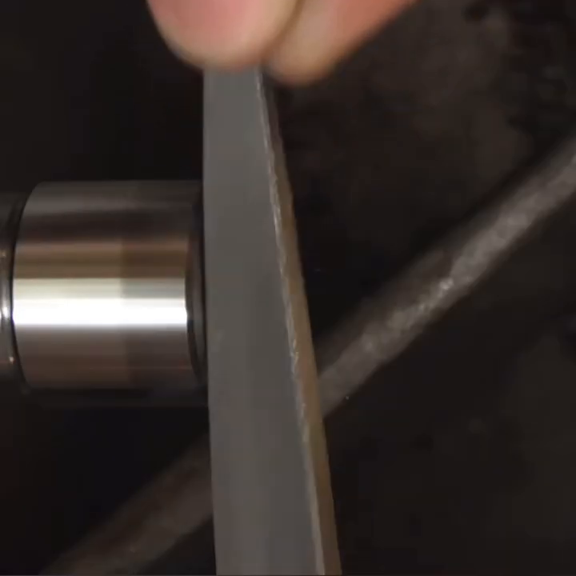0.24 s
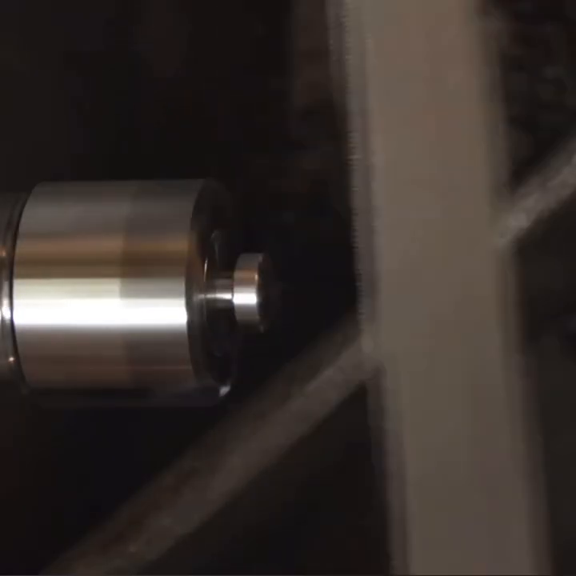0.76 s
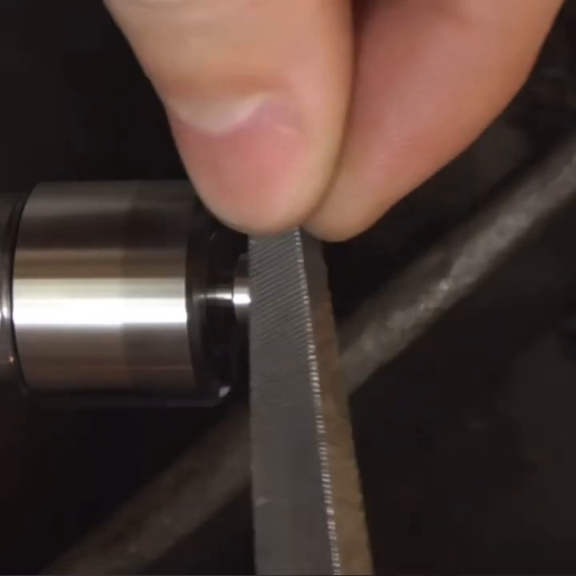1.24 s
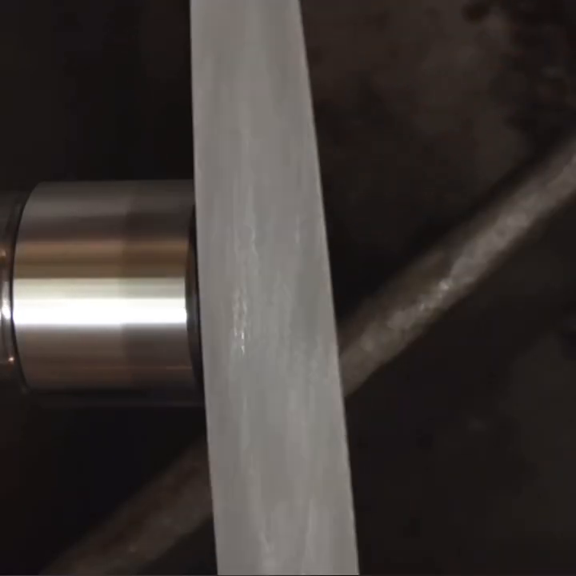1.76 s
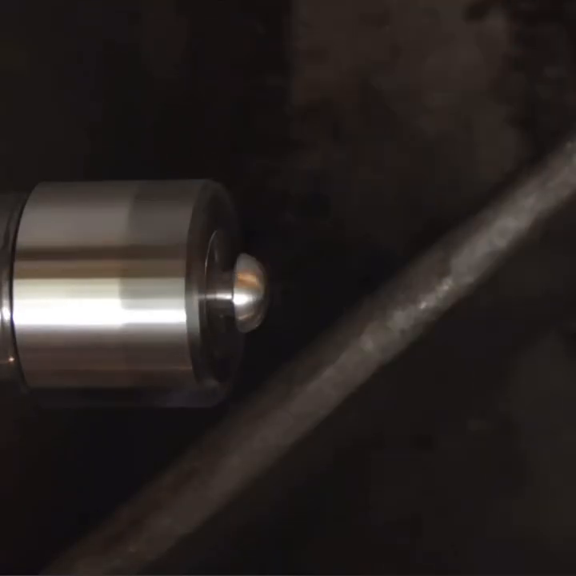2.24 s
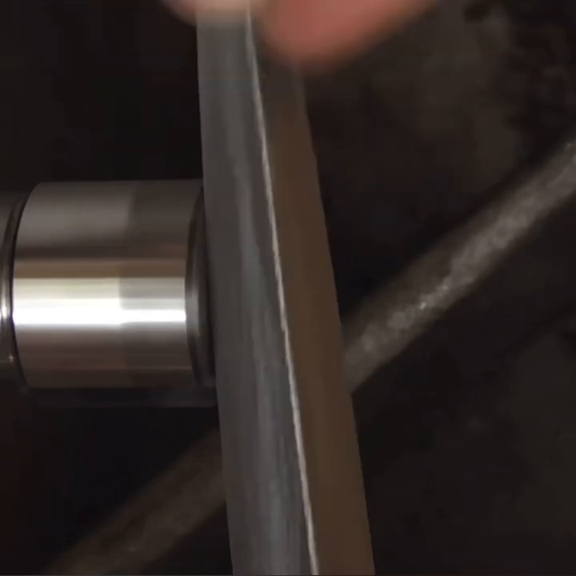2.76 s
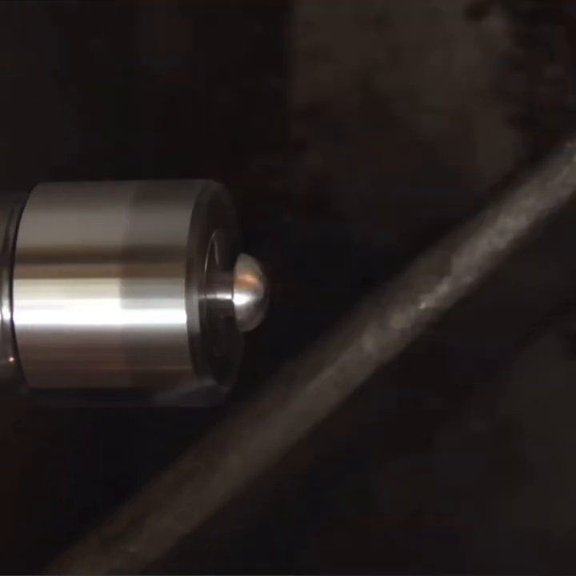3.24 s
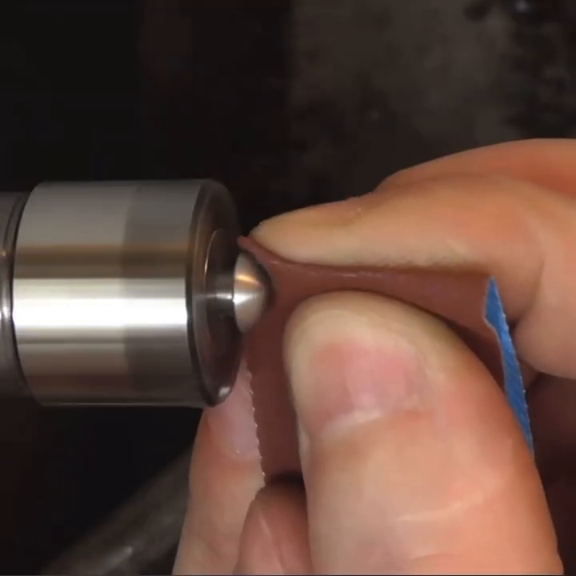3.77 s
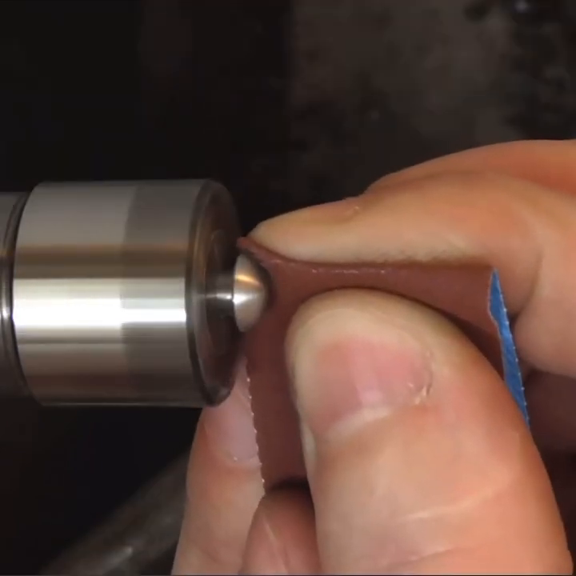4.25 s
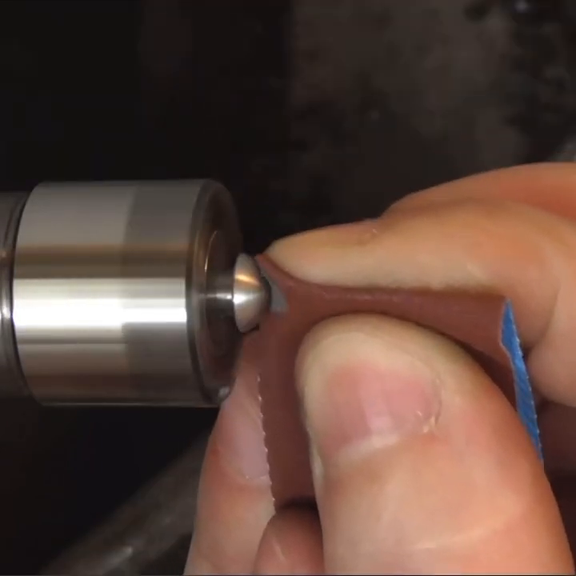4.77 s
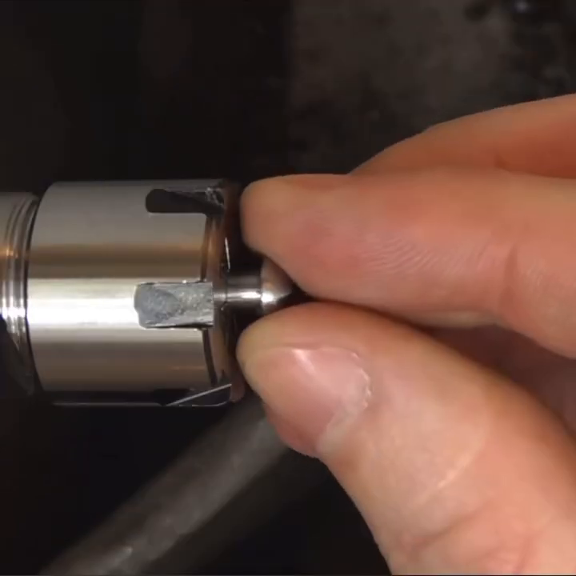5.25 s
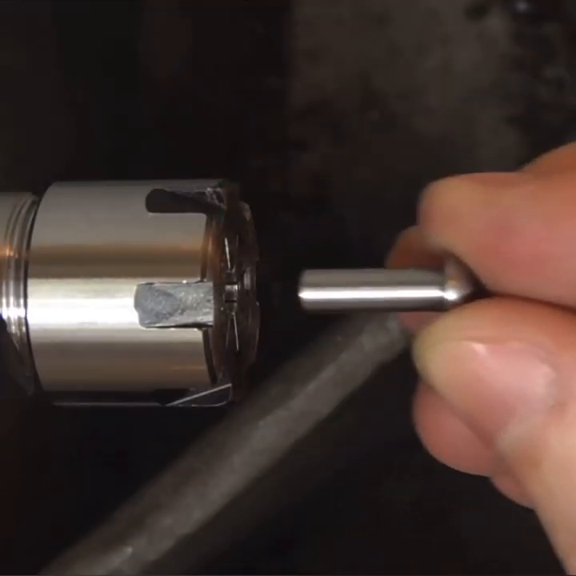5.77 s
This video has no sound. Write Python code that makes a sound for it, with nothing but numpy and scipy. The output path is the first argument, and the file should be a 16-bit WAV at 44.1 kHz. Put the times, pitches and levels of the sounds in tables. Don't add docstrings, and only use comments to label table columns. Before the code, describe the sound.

A small metal lathe hums and rattles close by while a file rasps in strokes, abrasive cloth hisses, then near silence with faint metallic slips.

```python
import sys
import numpy as np
from scipy import signal
from scipy.fft import rfft, irfft, next_fast_len
from scipy.io import wavfile
from scipy.ndimage import map_coordinates

SR = 44100
rng = np.random.default_rng(int(sys.argv[2]) if len(sys.argv) > 2 else 0)


def persist_wave(psi):
    counts = np.round(np.clip(psi, -1, 1) * 32767).astype(np.int16)
    wavfile.write(sys.argv[1], SR, np.atleast_2d(counts).T)


def level_to_linear(level):
    exponent = np.asarray(level, float) / 20
    return 10 ** exponent


N = 264600
TIME_S = np.arange(N) / SR
SPARE = SR // 10
STOP_S, FADE_S = 4.9365, .003
SPINDLE_HZ = 17.964
LUMPS_HZ = 6 * SPINDLE_HZ

# [t/s, skipped running time/s, level step/dB]
SCENE_CHANGES = [
    (0.136, .011, -26),
    (1.917, .0099, -42),
    (3.337, .0199, -29),
]
# [hum/dB, roar/dB, rattle/dB, cage/dB, whine/dB]
TAKE_LEVELS = [
    (-30, -20.5, -34, -37, -30.5),
    (-32, -23.5, -36.5, -41, -32),
    (-31.5, -23, -35, -39.5, -32.5),
    (-32.5, -23, -33.5, -36.5, -27.5),
]
# [multiple of spindle speed, level/dB]
SPINDLE_ORDERS = [(8.09, -44), (12.93, -42.5), (14.88, -48), (15.94, -43), (22.1, -38), (27.82, -39.5),
                  (34, -40.5), (41.58, -39), (45.7, -41.5), (61.77, -41.5), (76, -46), (48.64, -42.5),
                  (66.7, -44.5), (103.1, -47)]
# [f/Hz, level/dB]
WHINE = [(214, -6), (770, 0), (1567, -13.5)]
# [t/s, level/dB]
GEAR_LOAD = [(0.0, -19), (0.59, -16.5), (0.67, -19.5), (1.02, -14), (1.91, -18), (1.94, -26.5), (1.98, -15),
             (2.07, -21.5), (2.18, -14.5), (2.37, -20), (2.48, -15), (2.73, -17.5), (2.79, -15),
             (3.03, -22.5), (3.08, -17.5), (4.52, -17.5), (4.9, -14), (4.93, -13)]
# [f/Hz, density/dB per Hz]
CASING = [(24, -76), (40, -40), (91, -25.5), (129, -23), (202, -11.5), (253, -9), (333, -17.5),
          (495, -20.5), (668, -17.5), (776, -18.5), (1560, -26.5), (2440, -30.5), (4330, -31), (12300, -42),
          (15400, -93)]
# [f/Hz, width/Hz, boost/dB]
CASING_PANELS = [(185, 26, 1.5), (250, 69, 0.77), (293, 27, 3.5), (429, 22, 10), (512.5, 48, 10),
                 (578, 25, 6), (797, 38, 4.8), (838, 56, 7.5), (1057, 76, 4.4), (1396, 110, 4.7),
                 (1556, 94, 12), (1904, 36, 6.5), (2234, 75, 4.4), (6060, 810, -3)]
# [f/Hz, width/Hz, level/dB]
HOUSING_MODES = [(3860, 220, -7), (4295, 130, 3), (6900, 160, -9), (7540, 120, -8)]
CAGE_MODES = [(5000, 270, 0)]
# [t/s, peak/dB]
BALL_KNOCKS = [(0.0643, -31), (0.0797, -25.5), (0.0972, -16), (0.1166, -21), (0.1516, -26.5),
               (0.2409, -30), (0.2683, -27), (0.379, -23.5), (0.4696, -23), (0.4903, -23.5), (0.598, -27),
               (0.6285, -28), (0.6394, -22), (0.6584, -19), (0.7083, -25), (0.7667, -25), (0.82, -17.5),
               (0.8629, -22.5), (0.8959, -24.5), (0.9612, -24), (0.9906, -25), (1.0271, -21),
               (1.0465, -26), (1.1418, -27), (1.1742, -25), (1.2096, -23.5), (1.2511, -30.5),
               (1.2685, -16), (1.3214, -27), (1.3603, -24), (1.3972, -25), (1.4152, -28), (1.4731, -28),
               (1.5294, -28), (1.5484, -17), (1.5838, -30), (1.6053, -20), (1.7664, -24), (1.8816, -25),
               (1.9335, -27), (1.9485, -26), (1.9829, -24), (2.002, -22), (2.0238, -26), (2.0617, -21),
               (2.1375, -20), (2.1595, -24.5), (2.1899, -26), (2.2184, -23), (2.3316, -27), (2.355, -22),
               (2.4089, -25),
               (2.4088, -26.5), (2.4652, -30), (2.559, -19), (2.5794, -21.5), (2.6627, -26), (2.6702, -21),
               (2.6892, -23), (2.725, -18.5), (2.758, -30), (2.776, -22), (2.8254, -25.5), (2.845, -24),
               (2.9117, -26), (2.9436, -26), (3.0035, -24.5), (3.0409, -27), (3.0753, -23.5),
               (3.1077, -20.5), (3.1691, -25), (3.1885, -24.5), (3.2085, -27), (3.221, -19),
               (3.3307, -26.5), (3.3956, -26.5), (3.4554, -22.5), (3.5372, -19.5), (3.6011, -22),
               (3.7543, -31), (3.871, -23), (3.9378, -27), (3.955, -18.5), (4.0082, -28), (4.0631, -27.5),
               (4.101, -23), (4.2167, -30), (4.2337, -24.5), (4.3065, -29), (4.3414, -22.5), (4.3983, -22),
               (4.4562, -22), (4.508, -20), (4.529, -20), (4.5644, -23.5), (4.6058, -26.5), (4.6223, -24),
               (4.6457, -25), (4.6652, -23), (4.7156, -26), (4.7689, -21.5), (4.822, -25.5), (4.8615, -28),
               (4.891, -18.5)]
# [t/s, peak/dB]
CAGE_PINGS = [(0.0578, -27), (0.0707, -25.5), (0.1136, -29.5), (0.2793, -28), (0.6374, -32),
              (0.6769, -26.5), (0.9143, -30), (0.9273, -26), (1.054, -31.5), (1.0954, -35), (1.1313, -33),
              (1.275, -31), (1.3593, -23.5), (1.5743, -31), (1.706, -27.5), (1.9589, -27), (2.0433, -34),
              (2.2263, -24.5), (2.3291, -31), (2.5097, -23), (2.5945, -25.5), (2.6399, -29), (2.6698, -27),
              (2.6903, -28.5), (2.8828, -30), (2.9297, -29), (3.0754, -25.5), (3.1872, -27.5), (3.26, -24),
              (3.3054, -31), (3.5653, -28.5), (3.7075, -25.5), (3.7584, -26), (3.7968, -26), (3.8691, -30),
              (3.9325, -28.5), (4.0457, -28.5), (4.0971, -27.5), (4.1375, -27), (4.359, -30.5),
              (4.4248, -22), (4.5027, -26.5), (4.5321, -24), (4.6678, -26.5), (4.7112, -28),
              (4.7262, -26.5), (4.7611, -25), (4.8494, -27.5), (4.8648, -24.5), (4.8923, -24)]
# [f/Hz, density/dB per Hz]
COOLING_AIR = [(9000, -30), (11500, -7.5), (12500, -7), (13500, 3), (14500, -7.5), (15500, -24)]

# [t/s, pressure/dB, free blade pitch f/Hz]
STROKES = [
    [(.14, -32.5, 7600), (.158, -44, 7600), (.17, -31.5, 7600), (.258, -31, 7600), (.3, -37.5, 7700),
     (.37, -35, 8230), (.62, -36, 7600), (.7, -34, 7600), (.82, -53, 7600)],
    [(1.3, -48, 8200), (1.45, -41, 8200), (1.59, -35.5, 8400), (1.75, -34.5, 7150), (1.87, -39, 7680),
     (1.94, -34, 6900), (1.98, -33.5, 7100), (2.05, -34.5, 7440), (2.15, -51.5, 7460)],
    [(2.62, -49, 7800), (2.69, -40.5, 7900), (2.725, -36.5, 7900), (2.83, -32.5, 7280), (2.88, -33, 6940),
     (3.0, -33.5, 7240), (3.06, -34, 7270), (3.15, -43.5, 7250), (3.2, -49, 7300)],
]
# [t/s, hold/s, level/dB]
LEANS = [(.52, .04, -44.5), (.72, .04, -43.5), (.94, .08, -43), (1.58, .06, -40), (1.69, .025, -42.5),
         (1.78, .03, -39.5), (1.855, 0.031, -39.5), (1.95, .07, -39.5), (2.725, .03, -38),
         (2.85, .02, -41.5), (2.93, .03, -36.5), (2.995, .025, -37), (3.075, .02, -40.5)]
# [t/s, hold/s, level/dB]
TIP_BITES = [
    (.165, .03, -39),
    (2.692, .015, -41.5),
    (2.72, 0.049, -35),
]
# [t/s, hold/s, level/dB]
MIDDLE_SQUEAK = [
    (1.8, .008, -31),
]
# [f/Hz, width/Hz, level/dB]
BLADE_MODES = [(6900, 190, -4.5), (7600, 400, -4.5), (8400, 710, -11)]
TIP_MODES = [(10000, 650, 3), (11700, 800, -19)]
MIDDLE_MODES = [(5580, 410, 0.5), (6300, 100, -2)]
HEEL_MODES = [(3800, 360, -5.5), (4250, 1400, -9), (3160, 230, -13.5)]
# [f/Hz, density/dB per Hz]
TEETH_RASP = [(1500, -32), (3000, -11), (6000, -11), (9000, 0.5), (12000, -10), (15000, -16)]
# [t/s, peak/dB, tip ring re peak/dB]
TOOTH_CATCHES = [(0.1406, -22, -7), (0.169, -19.5, -9.5), (0.1774, -20, -6), (0.186, -21.5, -12),
                 (0.1964, -21.5, -12.5), (0.206, -18, -15), (0.2144, -23, -16.5), (0.2246, -11, -20.5),
                 (0.2424, -24, -7), (0.2514, -19.5, -9), (0.2606, -16.5, -13.5), (0.2794, -26, -11),
                 (0.3168, -18, -21), (0.406, -28, -22), (1.705, -29.5, -17), (1.7794, -29, -15),
                 (1.7974, -32, -18), (1.8068, -26, -20), (2.9985, -21, -22)]
# [t/s, peak/dB]
TREBLE_SNAPS = [(0.169, -30), (0.206, -29.5), (2.6903, -33), (2.7257, -32)]
# [t/s, peak/dB, f/Hz]
TOOTH_CHATTER = [(0.3159, -19.5, 7510), (0.4065, -23, 8200), (0.5522, -24.5, 7470), (1.579, -21.5, 8380),
                 (1.6848, -25, 7600), (1.7059, -23.5, 7700), (1.8524, -25.5, 7470), (1.8708, -23, 7700),
                 (1.9404, -14, 6750), (2.6905, -24, 10100), (2.7214, -20, 10000), (2.7508, -20, 9890),
                 (2.885, -21.5, 6860), (2.9985, -16.5, 7350)]
# [t/s, peak/dB, f/Hz]
BLADE_CHIRPS = [(1.795, -27, 5800), (2.3, -27.5, 5900), (1.94, -27, 6750), (1.955, -26.5, 3600),
                (1.98, -26, 3500), (1.8, -30, 8350), (.935, -35, 7450), (0.87, -34.5, 6500)]

# [t/s, hold/s, level/dB]
THUMB_PRESSES = [(3.425, 0.017, -23.5), (3.64, 0.054, -25.5), (3.914, 0.029, -27.5), (4.154, 0.037, -26),
                 (4.424, 0.039, -26), (4.7, 0.0081, -27), (4.87, 0.056, -36.5)]
# [f/Hz, density/dB per Hz]
CLOTH_HISS = [(4000, -14.5), (6000, -12.5), (7500, -7.5), (9500, -5.5), (12000, -11), (13500, -19),
              (14600, -16.5), (15500, -22)]
# [f/Hz, width/Hz, boost/dB]
PART_MODES = [(7540, 200, 7.2), (9150, 260, 3), (10370, 330, 6.5), (11660, 370, 7.1), (13100, 200, 3)]

# [t/s, hold/s, scrape/dB, low ring/dB, broad grit/dB]
DRAGS = [(5.156, .006, -68, -110, -99), (5.466, .008, -57, -70, -92.5), (5.485, .022, -59, -65.5, -92),
         (5.51, .012, -56, -65.5, -84.5), (5.548, .008, -74, -71, -94), (5.567, .01, -72, -66, -94),
         (5.61, .015, -64, -74, -79), (5.636, .024, -49, -75, -67), (5.656, .014, -55, -71, -61.5),
         (5.676, .014, -60, -74, -66), (5.698, 0.0058, -48, -60, -61), (5.721, .03, -74, -86, -82.5)]
# [t/s, peak/dB, low ring re peak/dB, high ring re peak/dB]
SHANK_SLIPS = [(5.2434, -84, -16, -11), (5.3084, -82, 7, -8), (5.509, -45.5, -28.5, -41),
               (5.5144, -47, -12, -37), (5.6072, -59, -15, -18), (5.6235, -56, -25, -18),
               (5.6341, -49, -32, -24), (5.6431, -44, -27, -18), (5.646, -46, -27, -20),
               (5.649, -44.5, -27, -20), (5.6512, -46, -27, -20), (5.6543, -47, -27, -18),
               (5.6574, -39, -27, -10), (5.666, -49, -25, -14), (5.6834, -50.5, -21, -12),
               (5.6964, -43, -21, -9), (5.6985, -46, -21, -10.5), (5.7015, -35.5, -24, -10.5),
               (5.7043, -44, -20, -14)]
# [t/s, peak/dB, f/Hz]
JAW_CHIRPS = [(5.153, -58, 8600), (5.156, -51, 8670), (5.159, -60, 8100), (5.239, -70, 8600),
              (5.465, -48, 8650), (5.469, -51, 8550), (5.478, -70, 5600), (5.491, -66, 5700),
              (5.495, -66, 9750), (5.509, -60, 9750), (5.601, -66, 5350), (5.683, -51, 6200),
              (5.634, -58, 13300), (5.657, -52, 13300)]
# [f/Hz, width/Hz, level/dB]
JAW_MODES = [(7460, 260, -2), (7970, 300, 0.5), (8300, 260, 1), (8640, 240, 0.5), (9100, 300, -9)]
SHANK_MODES = [(3480, 120, 0.1)]
# [f/Hz, density/dB per Hz]
COLLET_GRIT = [(500, -40), (4150, -45), (4400, -5), (5300, 0), (6200, -2), (7000, -8), (9800, -2.5),
               (11000, -7), (12200, -5), (12700, -22), (13300, -6), (13800, -30)]

# [f/Hz, density/dB per Hz]
ROOM_AIR = [(40, -10.5), (130, 0), (300, -9), (700, -16), (1500, -24), (3000, -31.5), (8000, -31),
            (14000, -26.5), (14600, -45)]
# [t/s, hold/s, level/dB]
MURMUR_SWELLS = [
    (5.19, .05, -75),
    (5.5, .11, -75),
    (5.91, .1, -71),
]
# [t/s, hold/s, level/dB]
CHUCK_PULLS = [
    (5.06, .01, -87),
    (5.496, .01, -85),
    (5.62, .04, -76),
    (5.84, .01, -86),
]
# [f/Hz, width/Hz, level/dB]
CHUCK_MODES = [(540, 90, 0)]
FAN_LINE = [(2400, 90, 0)]

# [f/Hz, coherence/1]
PORT_COHERENCE = [(60, 0.38), (130, 0.98), (290, 1), (640, 0.91), (1410, 0.84), (3090, 0.94), (6810, 0.1),
                  (15000, 0.37)]
# [f/Hz, level/dB]
PORT_BALANCE = [(60, -1.2), (120, -.1), (300, -.2), (500, 1.4), (1000, 3.1), (2000, 1.4), (4000, 1.0),
                (8000, -1.5), (15000, -1.3)]
# [f/Hz, phase/rad]
PORT_LEAD = [(30, 0), (250, .1), (500, .2), (780, .5), (1380, 0), (1640, .5), (1980, .1), (4390, .6),
             (4820, .9), (5680, .3), (12100, 0)]


def along(points, hz):
    f, v = np.transpose(points)
    return np.interp(np.log(hz + 1), np.log(f + 1), v)


def unit(x):
    return x / np.sqrt(np.mean(x ** 2) + 1e-20)


def gain_curve(points, outside_db=None):
    s, db = np.transpose(points)[:2]
    return level_to_linear(np.interp(TIME_S, s, db, outside_db, outside_db))


def swells(events, rise_db, fall_db):
    total = np.zeros(N)
    for s, hold, db in events:
        before = np.clip(s - TIME_S, 0, 1)
        after = np.clip(TIME_S - s - hold, 0, 1)
        total += level_to_linear(db - rise_db * before - fall_db * after)
    return total


def wobble(rate_hz, size=N):
    coarse = np.arange(0, size + 32, 32)
    knots = rng.standard_normal(int(size * rate_hz / SR) + 6)
    return np.interp(np.arange(size), coarse, map_coordinates(knots, [coarse * rate_hz / SR]))


def filtered(x, response):
    m = next_fast_len(x.shape[-1] + SR // 4)
    return irfft(rfft(x, m) * response(np.fft.rfftfreq(m, 1 / SR)), m)[..., :x.shape[-1]]


def ringing(modes):
    def response(f):
        total = 0
        for k, (centre, width, db) in enumerate(modes):
            band = 1j * f * width
            total = total + (-1) ** k * level_to_linear(db) * band / (centre * centre - f * f + band)
        return total
    return response


def sharp(modes):
    return lambda f: ringing(modes)(f) ** 2


def boosted(spectrum, bumps=()):
    def response(f):
        db = along(spectrum, f)
        for centre, width, boost in bumps:
            db = db + boost / (1 + (2 * (f - centre) / width) ** 2)
        return level_to_linear(db)
    return response


def grains(spiky_db, size=N):
    contacts = rng.standard_normal((2, size))
    return contacts * level_to_linear(spiky_db * rng.standard_normal((2, size)))


def stereo(pair, response, spread):
    def mid_side(f):
        angle = np.arccos(np.clip(along(PORT_COHERENCE, f), 0, 1) ** spread) / 2
        return response(f) * np.array([np.cos(angle), np.sin(angle)])
    mid, side = filtered(pair, mid_side)
    return unit(np.array([mid + side, mid - side]))


def struck(events, response):
    s, db = np.transpose(events)[:2]
    blows = np.bincount(np.round(s * SR).astype(int), level_to_linear(db), N)
    ring = irfft(response(np.fft.rfftfreq(4096, 1 / SR)))[:1024]
    return signal.fftconvolve(blows, ring / abs(ring).max())[:N]


def pinged(events, t60, rise_s):
    out = np.zeros(N + SR)
    t = np.arange(SR // 20) / SR
    rise = np.sin(np.pi / 2 * np.clip(t / rise_s, 0, 1)) ** 2
    for s, db, hz in events:
        start = round(s * SR)
        out[start:start + len(t)] += level_to_linear(db - 60 * t / t60) * rise * np.sin(2 * np.pi * hz * t)
    return out[:N]


def skipping(x):
    index = np.arange(N)
    skipped = sum(round(skip * SR) * (index >= s * SR) for s, skip, _ in SCENE_CHANGES)
    return x[..., index + skipped]


def workshop():
    def quiet(response):
        return stereo(grains(spiky_db=-5.0), response, spread=1.5)

    air = level_to_linear(-79.5) * quiet(boosted(ROOM_AIR))
    fan = level_to_linear(-96.0 + 5 * wobble(15)) * quiet(sharp(FAN_LINE))
    murmur_hz = 108 + 7 * (TIME_S - STOP_S)
    murmur = np.sqrt(2) * np.sin(2 * np.pi * np.cumsum(murmur_hz) / SR + .8 * wobble(30))
    murmur_gain = level_to_linear(-82.5) + swells(MURMUR_SWELLS, rise_db=210, fall_db=300)
    chuck_gain = swells(CHUCK_PULLS, rise_db=250, fall_db=110)
    return air + fan + murmur_gain * murmur + chuck_gain * quiet(sharp(CHUCK_MODES))


def scene_change_thumps():
    return struck([(s, db) for s, _, db in SCENE_CHANGES], lambda f: 1 / (1 + 1j * f / 30))


def lathe_levels():
    take = np.searchsorted([s for s, _, _ in SCENE_CHANGES], TIME_S)
    gear = gain_curve(GEAR_LOAD)
    load = gear / gear.mean()
    since_s = np.clip(TIME_S - SCENE_CHANGES[-1][0] - .8, -1, 1)
    warming_db = 2.5 * since_s * (take == take.max())
    hum, roar, rattle, cage, whine = level_to_linear(np.transpose(TAKE_LEVELS)[:, take] + warming_db)

    def drift(db, rate_hz):
        return level_to_linear(db * wobble(rate_hz))

    gear = gear * drift(0.37, 24)
    hum = hum * load ** .2 * drift(0.46, 3.4)
    roar = roar * load ** 0.33 * drift(0.6, 5.8)
    return gear, hum, roar, rattle * drift(0.49, 4.4), cage * drift(1.8, 11), whine * drift(0.86, 7)


def machine_tones(gear_gain, hum_gain, whine_gain):
    size = N + SPARE
    t = np.arange(size) / SR

    def tone(hz, loose_rad):
        phase = 5.95 * rng.random() + loose_rad * wobble(12, size)
        return np.sqrt(2) * np.sin(2 * np.pi * hz * t + phase)

    gear = tone(14 * SPINDLE_HZ, .15) * level_to_linear(1.2 * wobble(25, size))
    hum = tone(100, 0.088) * level_to_linear(1.4 * wobble(7.4, size))
    orders, whine = np.zeros((2, size))
    for k, db in SPINDLE_ORDERS:
        orders += level_to_linear(db + 4 * wobble(8, size)) * tone(k * SPINDLE_HZ, .6 + k / 50)
    for hz, db in WHINE:
        whine += level_to_linear(db + 2.2 * wobble(20, size)) * tone(hz, (hz / 1300) ** 2)
    tones = gear_gain * skipping(gear) + hum_gain * skipping(hum) + skipping(orders)
    return tones + whine_gain * skipping(whine)


def casing_roar(turn_rad):
    size = len(turn_rad)
    throb_db = 0.64 * np.cos(turn_rad) + 0.77 * np.cos(3 * turn_rad) + 0.96 * wobble(30, size)
    roar = level_to_linear(throb_db) * grains(spiky_db=3.5, size=size)
    return skipping(stereo(roar, boosted(CASING, CASING_PANELS), spread=2.9))


def bearing_rattle(turn_rad):
    size = len(turn_rad)
    passes = np.exp(0.38 * np.cos(3 * turn_rad)) * level_to_linear(2.8 * wobble(60, size))
    rattle = (.7 + passes) * grains(spiky_db=5.5, size=size)
    return skipping(stereo(rattle, ringing(HOUSING_MODES), spread=.8))


def cage_ring():
    size = N + SPARE
    contacts = level_to_linear(2.9 * wobble(50, size)) * grains(spiky_db=-3, size=size)
    return skipping(stereo(contacts, sharp(CAGE_MODES), spread=0.27))


def bearing_knocks():
    housing = sharp([(4336, 150, 3.5), (3850, 330, -2.5)])
    knocks = struck(BALL_KNOCKS, housing) * level_to_linear([[.8], [-.8]])
    pings = struck(CAGE_PINGS, sharp([(5020, 240, 0.1)])) * level_to_linear([[-.3], [.3]])
    return knocks + level_to_linear(-2.5) * pings


def cooling_air():
    return level_to_linear(-56.0 + 3 * wobble(7)) * stereo(grains(spiky_db=2), boosted(COOLING_AIR), spread=0.88)


def lathe():
    gear_gain, hum_gain, roar_gain, rattle_gain, cage_gain, whine_gain = lathe_levels()
    turn_rad = 2 * np.pi * SPINDLE_HZ * np.arange(N + SPARE) / SR
    mix = machine_tones(gear_gain, hum_gain, whine_gain)
    mix = mix + level_to_linear(2.5) * roar_gain * casing_roar(turn_rad)
    mix += rattle_gain * bearing_rattle(turn_rad) + cage_gain * cage_ring()
    return mix + bearing_knocks() + cooling_air()


def collet():
    s, hold, *levels = np.transpose(DRAGS)

    def drag_gain(db):
        tail = swells(zip(s, hold, db - 22), rise_db=600, fall_db=260)
        return swells(zip(s, hold, db), rise_db=1900, fall_db=1300) + tail

    def stick(response):
        return stereo(level_to_linear(2.5 * wobble(300)) * grains(spiky_db=5), response, spread=.6)

    scrape_gain, ring_gain, grit_gain = [drag_gain(db) for db in levels]
    drag = scrape_gain * stick(sharp(JAW_MODES)) + ring_gain * stick(sharp(SHANK_MODES))
    drag += level_to_linear(7.5) * grit_gain * stick(boosted(COLLET_GRIT))

    high_modes = [(5310, 1500, 0), (9890, 600, 0), (12060, 700, 0), (13300, 500, 0)]
    high_events = [(s, db + high) for s, db, _, high in SHANK_SLIPS]
    low_events = [(s, db + low) for s, db, low, _ in SHANK_SLIPS]
    slips = level_to_linear(4) * struck(SHANK_SLIPS, sharp([(8260, 800, .1)]))
    slips += pinged(JAW_CHIRPS, t60=.035, rise_s=.003)
    slips += level_to_linear(7.0) * struck(high_events, sharp(high_modes))
    slips += level_to_linear(3.0) * struck(low_events, sharp(SHANK_MODES))
    return (level_to_linear(-3.5) * drag + slips) * level_to_linear([[1.5], [-1.5]])


def cloth():
    lumps = level_to_linear(0.54 * wobble(108) + 1.2 * wobble(400))
    press = swells(THUMB_PRESSES, rise_db=381, fall_db=300.5)
    press += swells([(3.36, 2, -42.5)], rise_db=399.5, fall_db=1)
    return press * stereo(lumps * grains(spiky_db=1.5), boosted(CLOTH_HISS, PART_MODES), spread=0.73)


def tooth_catches():
    tip_events = [(s, db + tip) for s, db, tip in TOOTH_CATCHES]
    catches = level_to_linear(2.5) * struck(TOOTH_CATCHES, ringing([(7600, 500, 0.5), (7500, 3500, -19.5)]))
    catches += struck(TREBLE_SNAPS, ringing([(11000, 7000, 0.1)]))
    catches += level_to_linear(-4.5) * pinged(TOOTH_CHATTER, t60=.012, rise_s=.0005)
    catches += pinged(BLADE_CHIRPS, t60=0.05, rise_s=.003)
    catches += level_to_linear(10.0) * struck(tip_events, ringing([(9700, 340, 0.0074)]))
    return catches * level_to_linear([[-.8], [.8]])


def hand_file():
    pressure = sum(gain_curve(np.array(stroke)[:, :2], outside_db=-150) for stroke in STROKES)
    rasp_gain = level_to_linear(-0.5) * pressure + swells(LEANS, rise_db=700, fall_db=500)
    sing_hz = np.interp(TIME_S, *np.concatenate(STROKES)[:, ::2].T)
    tip_gain = level_to_linear(-11.5) * rasp_gain + swells(TIP_BITES, rise_db=2500, fall_db=160.5)
    squeak = swells(MIDDLE_SQUEAK, rise_db=898.5, fall_db=900)
    middle_gain = level_to_linear(-4 + 1.5 * wobble(25)) * rasp_gain + squeak
    heel_gain = level_to_linear(-7 + 16 * (7600 - sing_hz) / 1000) * rasp_gain
    uneven = level_to_linear(1.1 * wobble(LUMPS_HZ) + 0.51 * wobble(14))

    def blade(f):
        return ringing(BLADE_MODES)(f) + 0.19 * level_to_linear(along(TEETH_RASP, f))

    def scraped(response):
        return stereo(uneven * grains(spiky_db=5.5), response, spread=.6)

    scrape = rasp_gain * scraped(blade) + tip_gain * scraped(sharp(TIP_MODES))
    scrape += heel_gain * scraped(ringing(HEEL_MODES)) + middle_gain * scraped(ringing(MIDDLE_MODES))
    flutter = stereo(uneven * grains(spiky_db=0.5), lambda f: 1 / (1 + (f / 220) ** 2), spread=.1)
    carrier = np.sin(2 * np.pi * np.cumsum(sing_hz) / SR)
    sing = level_to_linear(-6.5 + 3 * wobble(40)) * rasp_gain * flutter * carrier
    return level_to_linear(-2.5) * scrape + sing + tooth_catches()


def scene():
    running = np.clip((STOP_S - TIME_S) / FADE_S + .5, 0, 1)
    work = lathe() + hand_file() + cloth() + scene_change_thumps()
    return work * running + collet() + workshop()


def band_limit(x):
    return signal.sosfilt(signal.butter(12, 15580, fs=SR, output="sos"), x)


def record(dry):
    def port(f, share):
        return level_to_linear(along(PORT_BALANCE, f) * share) * np.exp(1j * along(PORT_LEAD, f) * share)

    mix = filtered(dry, lambda f: np.array([port(f, .5), port(f, -.5)]))
    return band_limit(mix)


dry = scene()
out = record(dry)
persist_wave(out)
```